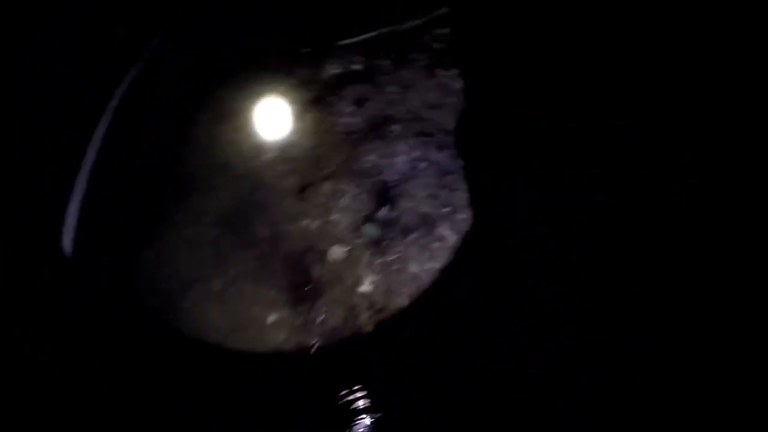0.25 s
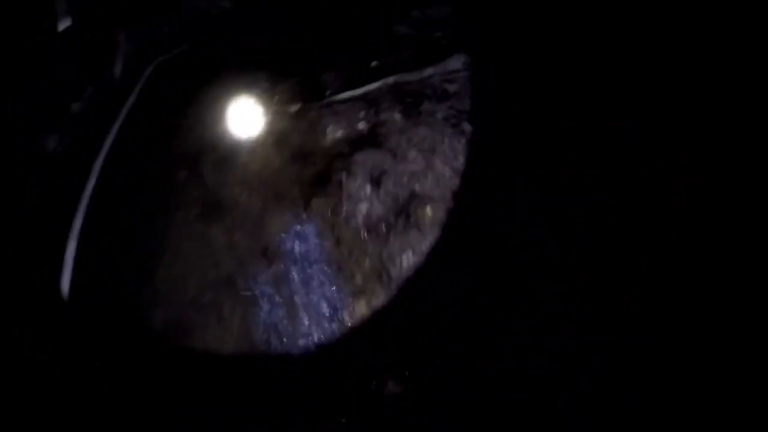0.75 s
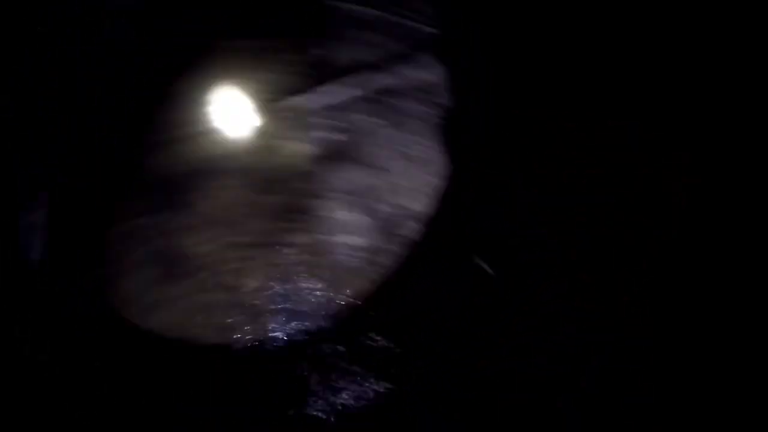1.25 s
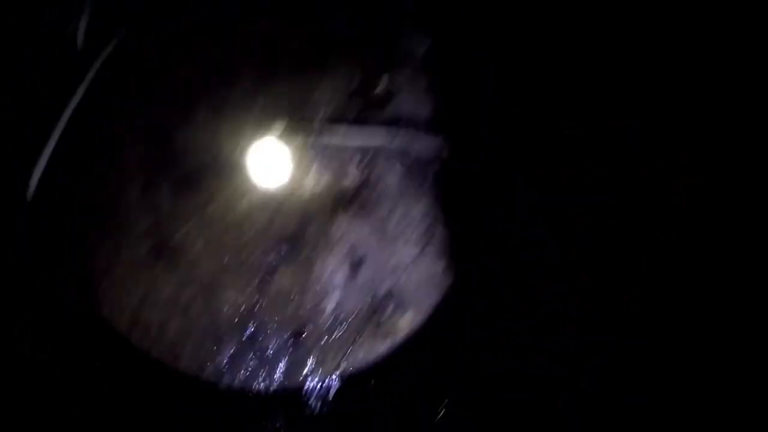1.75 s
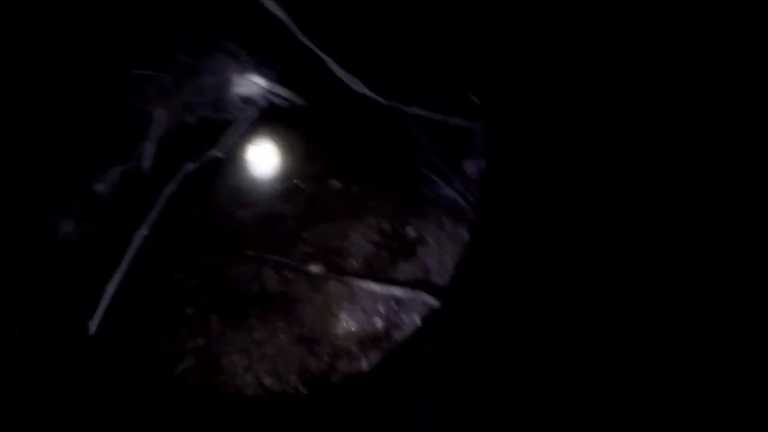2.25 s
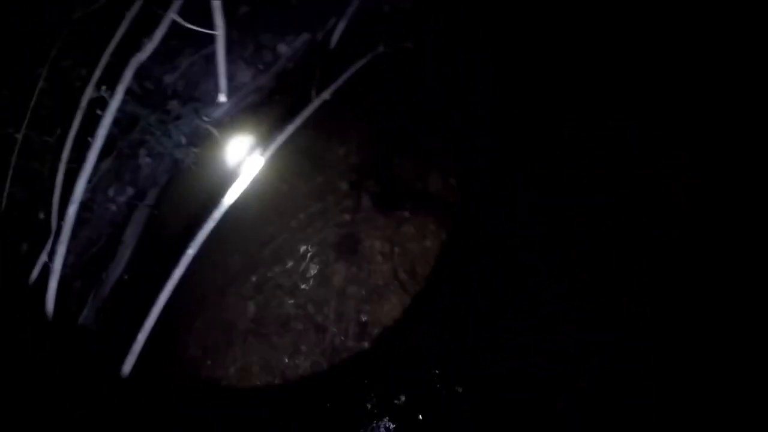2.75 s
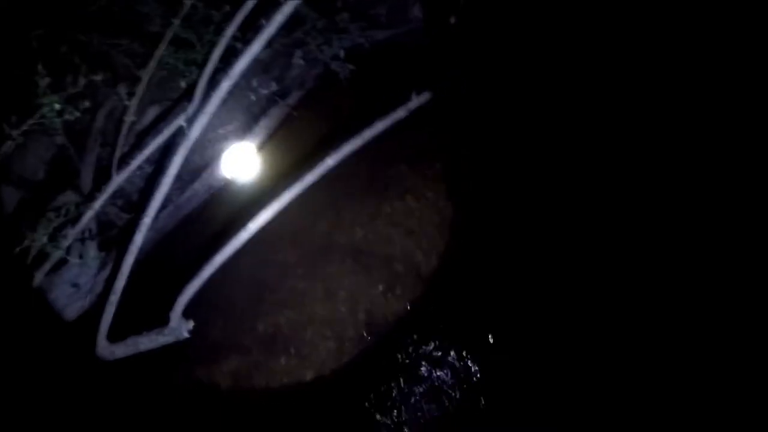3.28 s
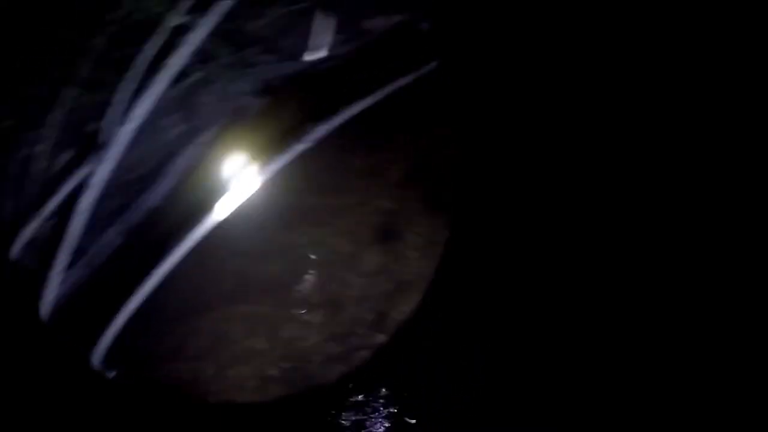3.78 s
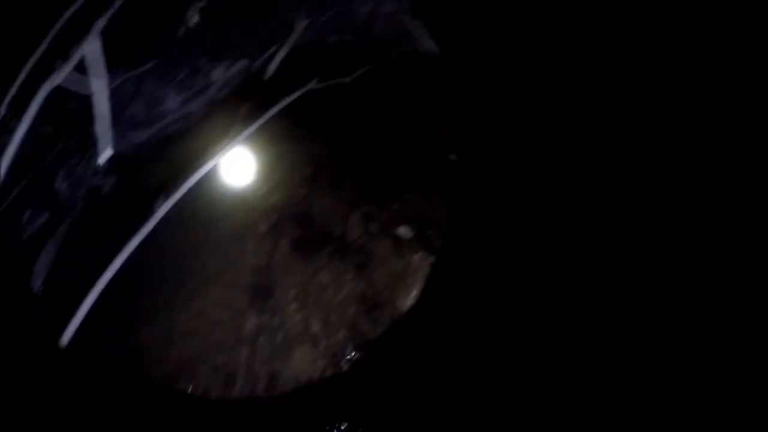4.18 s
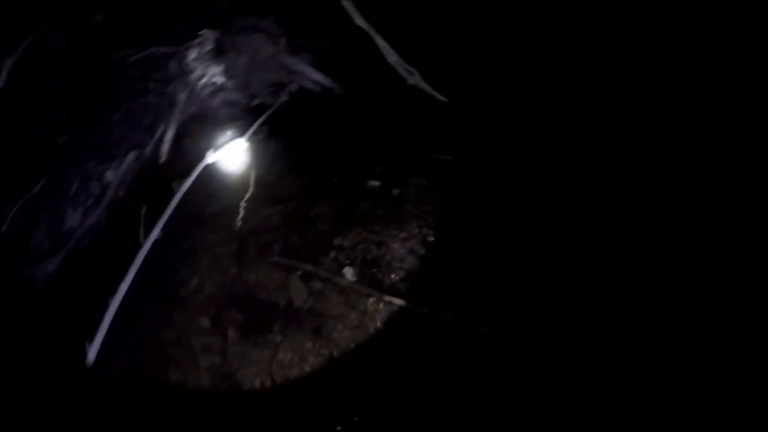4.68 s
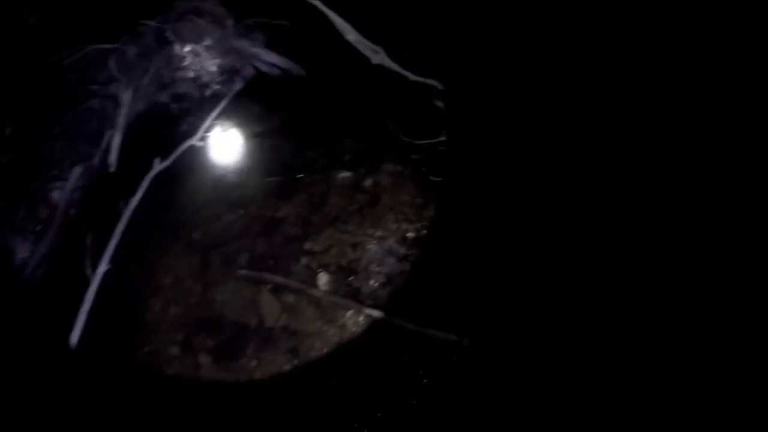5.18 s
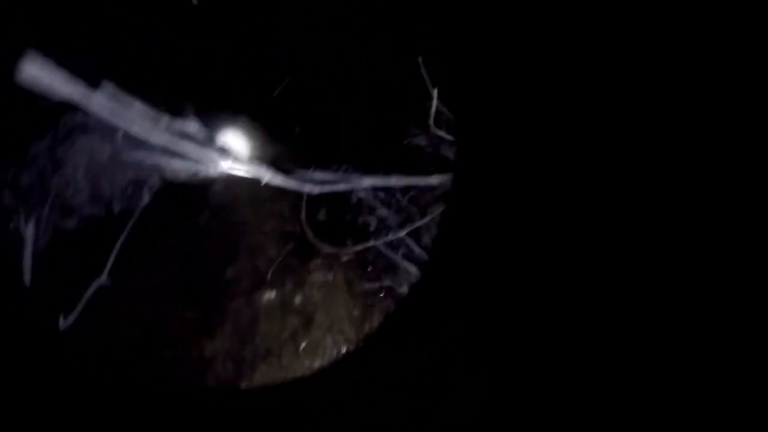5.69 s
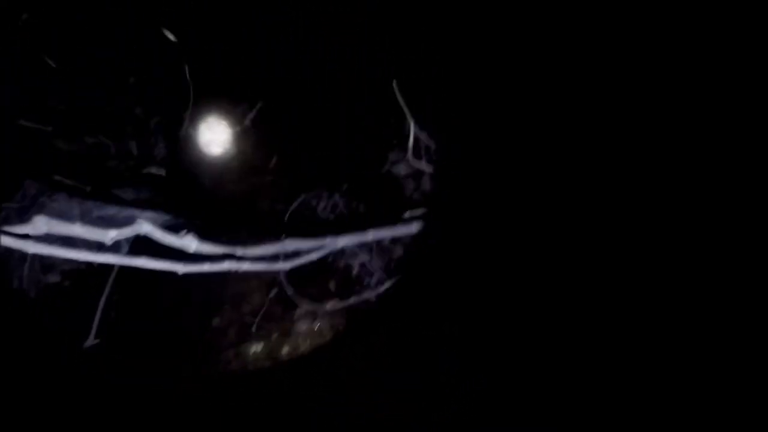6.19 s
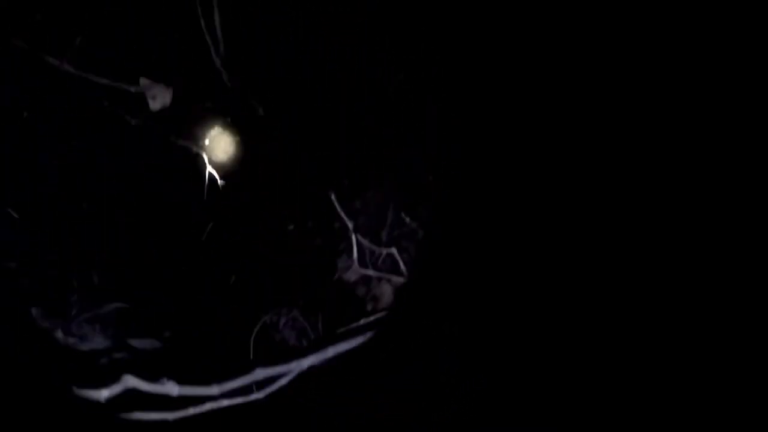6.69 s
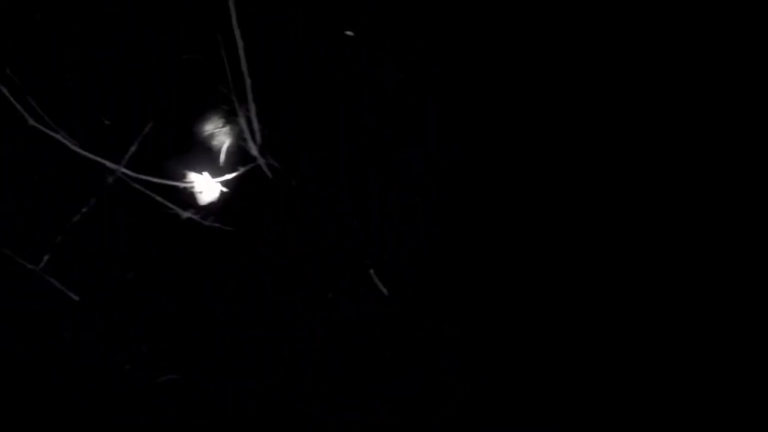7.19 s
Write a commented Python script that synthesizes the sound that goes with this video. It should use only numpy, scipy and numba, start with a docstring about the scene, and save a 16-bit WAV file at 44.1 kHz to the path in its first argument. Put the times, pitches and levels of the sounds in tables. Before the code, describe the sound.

Someone steps through shallow water in the dark, splashing unevenly with dull body bumps, stems crackling past early on, while crickets trill continuously.

```python
"""A shallow creek at night: someone wades slowly, a microphone in a closed housing worn on the body.
Sloshes are bursts of clicks ringing the housing's resonances; bubbles, ticks and knocks are short rings.
Reeds brush past as filtered crackle; sway and thuds of the body are narrow low noise.
Crickets trill in sliding tones, low chirps ring one resonance, katydids and a soft hiss are shaped noise."""
import sys
import numpy as np
from scipy import signal
from scipy.fft import rfft, irfft, next_fast_len
from scipy.io import wavfile
from scipy.ndimage import uniform_filter1d
from numba import njit

SR = 44100
rng = np.random.default_rng(int(sys.argv[2]) if len(sys.argv) > 2 else 0)


def gain_from_decibels(decibels):
    """Convert decibel values to linear amplitude factors."""
    exponent = np.asarray(decibels, float) / 20
    return 10 ** exponent


def master(y):
    """Save y as 16-bit WAV."""
    cut = np.clip(np.atleast_2d(y).T, -1, 1)
    pcm = np.round(cut * 32767)  # scale
    wavfile.write(sys.argv[1], SR, pcm.astype(np.int16))


N = 328211
TIME = np.arange(N) / SR  # s


def level(x, db):
    """Scale to an rms level in dB."""
    return x * gain_from_decibels(db) / np.sqrt(np.mean(x ** 2))


def noise():
    """White noise."""
    return rng.standard_normal(N)


def colour(x, points):
    """Filter by (hz, db) points, straight in log frequency, cut outside them; rms 1."""
    hz, db = np.transpose(points)
    f = np.maximum(np.arange(N // 2 + 1) * SR / N, 1)
    gain_db = np.interp(np.log(f), np.log(hz), db, left=-90, right=-90)
    return level(irfft(rfft(x) * gain_from_decibels(gain_db), N), 0)


def walk(rate_hz):
    """Random levels held 1 / rate_hz and slewed twice; rms 1."""
    k = int(SR / rate_hz)
    steps = np.repeat(rng.standard_normal(N // k + 1), k)
    slewed = uniform_filter1d(uniform_filter1d(steps, k), k)
    return level(slewed[:N], 0)


def grit(rate_hz, spread_db):
    """Random clicks, a few much larger than the rest; rms 1."""
    hit = rng.random(N) < rate_hz / SR
    size = gain_from_decibels(spread_db * rng.exponential(size=N))
    return level(hit * noise() * size, 0)


@njit
def svf(x, hz, width):
    """State-variable band-pass with a moving centre, gain 1 there."""
    y, band, low = np.empty(len(x)), 0., 0.
    for i in range(len(x)):
        g, k = np.tan(np.pi * hz[i] / SR), width / hz[i]
        v = (band + g * (x[i] - low)) / (1 + g * (g + k))
        band, low, y[i] = 2 * v - band, low + 2 * g * v, k * v
    return y


def ring(x, hz, width_hz, drift):
    """Two band-passes in series on one randomly drifting centre; width_hz sets the first; rms 1."""
    centre_hz = hz * (1 + drift * walk(25))
    once = svf(x, centre_hz, 1. * width_hz)
    return level(svf(once, centre_hz, 1.96 * width_hz), 0)


def even(x, samples):
    """Overlap of many small events: partly flattens the short-term power; rms 1."""
    power = uniform_filter1d(x ** 2, samples)
    return level(x / (power + 0.12) ** 0.3, 0)


def steady(x, power):
    """Even out the chance swells of a narrow noise; rms 1."""
    envelope = np.abs(signal.hilbert(x, next_fast_len(N))[:N])
    return level(x / (envelope + 0.75) ** power, 0)


def pings(table, glide):
    """Short rings that swell and die, at their pitch when they peak; positive glide climbs."""
    out = np.zeros(N)
    for start_s, peak_db, pitch_hz, cycles in table:
        first = int(start_s * SR)
        t = TIME[:min(int(4 * cycles / pitch_hz * SR), N - first)]
        age = 2 * t * pitch_hz / cycles  # 1 at the peak
        tone = np.sin(2 * np.pi * pitch_hz * t * (1 + glide * (age - 2)))
        out[first:first + len(t)] += gain_from_decibels(peak_db) * age * np.exp(1 - age) * tone
    return out


def spells(table, rise_db_per_s, fall_db_per_s, rest_db):
    """Gain that rises to each spell, holds and falls again; the loudest spell counts."""
    gain_db = np.full(N, 1. * rest_db)
    for start_s, hold_s, db in table:
        span = slice(max(int((start_s - .5) * SR), 0), int((start_s + hold_s + .5) * SR))
        t = TIME[span]
        before_db = rise_db_per_s * (start_s - t)
        after_db = fall_db_per_s * (t - start_s - hold_s)
        spell_db = db - np.maximum(0, np.maximum(before_db, after_db))
        gain_db[span] = np.maximum(gain_db[span], spell_db)
    return gain_from_decibels(gain_db)


def trill(hz, rate_hz, slide):
    """Each wing stroke is a short tone that slides down."""
    stroke = (np.cumsum(rate_hz * (1 + .06 * walk(6))) / SR + rng.random()) % 1
    pitch_hz = hz * (1 + .012 * walk(30) + slide * (.35 - stroke))
    pulse = np.sin(np.pi * np.clip(stroke / 0.82, 0, 1)) ** 2
    return pulse * np.sin(2 * np.pi * np.cumsum(pitch_hz) / SR)


# sloshes of the legs: (start_s, length_s, drive_db, upper_over_lower_resonances_db, spray_db)
SLOSHES = [(0.143, .011, -62, 24, -22), (.403, .084, -55, 3, -8), (0.496, .016, -54.5, 16, -2),
           (0.629, .022, -52.5, -1, -21), (0.757, .016, -56.5, 11, -11), (.78, .063, -57, 7, 2),
           (0.84, .024, -57, 12, -5), (.877, .0054, -48, 6, 0), (0.894, .054, -50.5, 4, -2.5),
           (0.945, .042, -56.5, 5, -6), (1.04, .029, -46.5, 2.5, -20), (1.198, .077, -56, 2, -12),
           (1.277, .046, -50.5, 5, -7), (1.333, .018, -42, 2, -3), (1.354, .028, -41, 4, -3),
           (1.384, .035, -48, 2, -12), (1.429, .15, -49.5, 0, -5.5), (1.557, .054, -56, -3, -8),
           (1.604, .012, -45, 4, -7), (1.616, .072, -55.5, -1, -9), (1.708, .024, -51.5, 4, -12),
           (1.732, .025, -41.5, 3, -16), (1.797, .05, -53, -5, -13), (1.911, .008, -51, -10, -9),
           (1.99, .038, -50.5, 1, -10), (2.311, .01, -46.5, -4, -15), (2.332, .028, -57.5, -5, -20),
           (2.351, .011, -51, 5, -9), (2.367, .029, -58, -5, -11), (2.596, .021, -55, -2, -9),
           (2.855, .03, -51, -0.5, -16), (3.08, .074, -44.5, 1.5, -11), (3.156, .014, -52, -1, -7),
           (3.322, .011, -49, -7, -19), (3.371, .015, -51.5, 1, -25), (3.418, .0084, -53.5, -2, -18),
           (3.587, .014, -54, -3, -12), (3.606, .04, -45.5, 1.5, -9), (3.652, .081, -54.5, 1, -11),
           (3.748, .031, -51, 0, -7), (3.784, .02, -45.5, 1, -19), (3.803, .024, -57, -1, -11),
           (3.822, .015, -44.5, -4, -25), (3.835, .063, -59, -3, -15), (3.959, .0041, -41, 2, -11),
           (3.979, .017, -45, 6, -15), (3.993, .014, -46, 1, -12), (4.073, .048, -53, 1, -17),
           (4.131, .011, -48.5, -3, -13), (4.93, .045, -53.5, 1, -24), (5.131, .009, -58, -1, -5),
           (6.075, .014, -42, 1, -14), (6.095, .023, -43, 0, -14), (6.183, .018, -55, -1, -13),
           (6.201, .014, -51, -1, -12), (6.214, .04, -45.5, -1.5, -13.5), (6.382, .014, -55.5, 9, -17),
           (6.529, .008, -59, 8, -14), (6.58, .033, -57, -1, -8), (6.613, .023, -48.5, 0, -21),
           (6.678, .02, -56.5, -2, -12), (6.802, .066, -55, -4, -14), (7.052, .097, -58, 3, -10)]
# soft lapping between sloshes: (start_s, hold_s, drive_db)
LAPPING = [(.17, .04, -66), (.27, 0.017, -59.5), (.4, 0.13, -60), (.62, 0.52, -63), (1.2, 0.68, -61.5),
           (1.96, 0.022, -58.5), (2.22, 0.15, -62.5), (2.52, 0.063, -61), (2.68, 0.033, -60.5),
           (2.8, .03, -64), (2.96, 0.33, -63.5), (3.28, .02, -57.5), (3.54, .5, -65), (4.36, 0.011, -66.5),
           (4.72, .01, -69), (4.8, .02, -65), (4.92, .01, -60.5), (5.04, .2, -64.5), (5.32, 0.044, -65.5),
           (5.52, 0.1, -61), (5.72, 0.0076, -58), (5.76, 0.092, -64), (5.92, .01, -61.5),
           (6.0, 0.023, -58.5), (6.28, 0.15, -62), (6.52, 0.17, -62), (6.86, 0.16, -60.5), (7.2, .01, -65),
           (7.34, 0.14, -63.5)]
# housing resonances: (pitch_hz, first_filter_width_hz, weight_db)
HOUSING = [(320, 340, -2), (600, 185, -2), (784, 360, -2), (1100, 420, -4), (1460, 233, -3),
           (1915, 184, -0.5), (2370, 360, -3), (2990, 690, -2), (4200, 1300, -10.5)]
# share of the lowest resonance as the wader turns: (time_s, share_db in a slosh of -46 dB drive)
BODY_SHARE = [(0, -13), (.6, -11), (1.2, -13), (1.9, -7.5), (2.3, -15), (4.0, -17), (6.1, -16),
              (6.6, -11.5), (7.44, -14)]


def sloshes():
    """Bursts of small bubbles and impacts, switched on for each slosh, ring the housing."""
    push = spells(LAPPING, rise_db_per_s=190, fall_db_per_s=210, rest_db=-80) * gain_from_decibels(2.8 * walk(40))
    tilt_db, spray_db, body_db = np.full(N, 0.), np.full(N, -12.), np.full(N, -14.)
    for start_s, length_s, drive_db, slosh_tilt_db, slosh_spray_db in SLOSHES:
        span = slice(int(start_s * SR), int((start_s + length_s) * SR))
        push[span] = gain_from_decibels(drive_db)
        tilt_db[span] = slosh_tilt_db
        spray_db[span] = slosh_spray_db
        # harder sloshes give the lowest resonance a smaller share
        body_db[span] = np.interp(start_s, *np.transpose(BODY_SHARE)) - 0.38 * (drive_db + 46)
    # quick to start, with a short dribble after
    dribble = signal.lfilter([.005], [1, .005 - 1], push)
    push = np.maximum(uniform_filter1d(push, 130), dribble)
    impacts = grit(3000, 0.69)
    rung = np.zeros(N)
    for k, (hz, width_hz, weight_db) in enumerate(HOUSING):
        if hz > 2200:
            share_db = spray_db
        elif hz < 450:
            share_db = body_db
        else:
            share_db = np.clip(1.3 * np.log2(hz / 1000.), -.5, .5) * tilt_db
        # bubbles of one size come and go on their own; impacts strike every resonance at once
        drive = 1.17 * impacts + grit(1500, 0.94)
        gain = gain_from_decibels(weight_db + uniform_filter1d(share_db, 90) + 2.8 * walk(45)) * np.sqrt(width_hz / 1000.)
        rung += (-1) ** k * gain * even(ring(drive, hz, width_hz, 0.022), samples=700)
    return push * rung


# thin high hiss in the hardest splash: (start_s, hold_s, level_db)
SQUIRT = [(1.338, .04, -71)]


def squirt():
    """A brief band of noise around 10 kHz."""
    gain = spells(SQUIRT, rise_db_per_s=1500, fall_db_per_s=1200, rest_db=-110)
    return gain * ring(noise(), 10000, 900, .01)


# the largest bubbles: (start_s, peak_db, pitch_hz)
BUBBLES = [(.763, -46.5, 1460), (.838, -45, 1350), (1.043, -49, 1440), (1.059, -45.5, 740),
           (1.351, -41, 1020), (1.353, -40, 1344), (1.364, -39, 700), (1.37, -40, 1466), (1.402, -46, 1500),
           (1.403, -43, 874), (1.457, -47, 874), (1.6, -51, 1140), (1.736, -50, 1270), (1.744, -38.5, 742),
           (1.749, -48, 1550), (2.312, -48.5, 696), (3.083, -36, 684), (3.102, -37, 807), (3.123, -43, 710),
           (3.13, -37.5, 1490), (3.146, -41, 780), (3.331, -49.5, 820), (3.614, -45, 1270),
           (3.636, -42, 665), (3.783, -50, 960), (3.791, -51, 600), (3.793, -47, 1277), (3.826, -45, 746),
           (3.994, -41, 1490), (3.996, -42, 715), (4.132, -50, 710), (4.136, -43.5, 1037),
           (6.083, -39, 854), (6.085, -39, 1446), (6.215, -41.5, 1240), (6.247, -46, 680),
           (6.52, -54, 1360), (6.625, -44, 837)]


def bubbles():
    """Each plop is a short ring that climbs slightly, as in a bubble near the surface."""
    ring_s = 0.0061  # twice the time to the peak
    return pings([(s, db, hz, hz * ring_s) for s, db, hz in BUBBLES], glide=0.0036)


# reeds dragged past, stroke by stroke: (start_s, hold_s, treble_level_db)
REED_STROKES = [(.41, .06, -72), (.5, 0.0044, -54), (.642, 0.012, -62), (.72, 0.077, -63), (.82, .02, -57),
                (.884, 0.0071, -57), (.946, .01, -66), (1.36, 0.013, -68), (1.45, 0.11, -64),
                (1.59, .14, -74)]
# tone of the scrape: (pitch_hz, density_db_per_hz)
REED_COLOUR = [(1180, -3.5), (2000, -7), (2180, -7), (2410, -7.5), (3060, -11.5), (4290, -1), (5440, -14.5),
               (6550, -13), (8810, -16), (10000, -23), (15200, -25.5)]


def reeds():
    """Blades scrape in crackly strokes, each size of blade on its own."""
    stroke = spells(REED_STROKES, rise_db_per_s=350, fall_db_per_s=310, rest_db=-96)
    blades = np.zeros(N)
    for hz in 1800 * 2 ** np.arange(0, 3.2, .5):
        crackle = grit(900, 1.9) + 0.78 * noise()
        blades += svf(crackle, np.full(N, hz), hz / 3)
    scrape = colour(blades, REED_COLOUR)
    treble = signal.sosfilt(signal.butter(4, 5800, "high", fs=SR, output="sos"), scrape)
    return stroke * scrape / np.std(treble)


# single ticks: (start_s, peak_db, pitch_hz, cycles to twice the peak time)
TICKS = [(0.501, -35, 4160, 9.5), (0.501, -37.5, 6570, 8.7), (0.501, -42, 8000, 7.2),
         (0.533, -42, 3930, 14), (.5847, -57, 6400, 9.4), (.66, -42, 3720, 8), (.7139, -50, 6500, 14),
         (0.7493, -40, 2380, 11), (.7563, -46, 4200, 6.7), (0.785, -45, 2500, 14), (.802, -44, 2500, 12),
         (.812, -40, 4050, 7.4), (0.8208, -29.5, 3920, 5.2), (.8201, -44, 6160, 10), (.855, -55, 13000, 6),
         (0.878, -46, 2330, 9.1), (.884, -47, 8700, 8), (.890, -43, 8300, 7), (.889, -38.5, 3620, 14),
         (.906, -53, 8200, 8), (1.342, -32, 1990, 17), (1.345, -34.5, 2800, 10), (1.446, -42, 6600, 3),
         (1.5964, -51, 6600, 4), (1.342, -47, 4600, 12), (1.352, -44, 4300, 10), (1.366, -48, 4700, 10),
         (1.472, -44, 2820, 10), (1.519, -51, 6500, 8.7), (1.806, -49, 2300, 7.4), (2.0, -46, 1800, 1.5),
         (2.575, -51, 900, 1.5), (2.599, -40, 1240, 1.6), (2.614, -44, 1900, 1.4), (5.137, -48, 1700, 1.3),
         (5.51, -52, 1300, 1.4), (5.81, -54, 900, 1.5), (5.86, -54, 900, 1.5), (6.69, -47, 1510, 1.7),
         (6.775, -50, 1100, 1.1), (6.99, -47, 1300, 1.4), (7.045, -49, 2300, 2.5), (7.36, -62, 1400, 1.6)]


def ticks():
    """Single stems snap back or drops tick, each with a short ring."""
    return pings(TICKS, glide=0.0029)


# swings of the body: (start_s, hold_s, gain_db)
SWINGS = [(0, 0.027, -29.5), (.21, 0.0075, -32.5), (.39, 0.02, -29), (.48, 0.0031, -27.5),
          (.68, 0.048, -27.5), (.78, 0.11, -31), (.99, 0.17, -34.5), (1.28, .13, -29), (1.44, 0.096, -26.5),
          (1.68, 0.0045, -26), (1.8, 0.062, -26.5), (1.9, 0.19, -32), (2.22, .01, -33.5),
          (2.32, 0.038, -27.5), (2.53, 0.0038, -29.5), (2.65, 0.004, -28), (2.78, 0.052, -28.5),
          (3.0, 0.04, -27), (3.11, 0.12, -30.5), (3.25, 0.037, -27.5), (3.36, 0.35, -32.5),
          (3.77, 0.034, -26), (3.92, 0.14, -31), (4.23, 0.054, -33.5), (4.37, .005, -30.5),
          (4.5, 0.065, -33.5), (4.7, 0.11, -31.5), (4.98, .24, -34.5), (5.34, .3, -35.5),
          (5.76, 0.18, -35.5), (6.03, 0.089, -32.5), (6.25, 0.16, -30), (6.59, 0.019, -23.5),
          (6.71, 0.097, -27.5), (6.92, 0.013, -26.5), (7.1, .15, -33), (7.33, 0.24, -31)]
# sway before it is evened and smoothed: (pitch_hz, density_db_per_hz)
SWAY_COLOUR = [(10, -10.5), (16, 1.5), (27, 0), (44, 1.5), (60, -7), (90, -51)]


def sway():
    """The housing sways with the body in slow, rounded swings: evened noise below 75 Hz."""
    swing = steady(colour(noise(), SWAY_COLOUR), 0.64)
    swing = signal.sosfiltfilt(signal.butter(4, 75, fs=SR, output="sos"), swing)
    return spells(SWINGS, rise_db_per_s=158, fall_db_per_s=197, rest_db=-38.5) * swing


# thuds that reach the housing through the body: (start_s, dull_gain_db, firm_over_dull_db)
THUDS = [(0, -47, -11), (.14, -40, -9), (.39, -44.5, -10), (.46, -37, -24), (.72, -42.5, -13),
         (.81, -53, -18), (.99, -45.5, -5.5), (1.3, -43.5, -13), (1.37, -40, -3), (1.47, -39, -5),
         (1.76, -37.5, -9.5), (1.84, -36.5, -13), (2.09, -44, -20), (2.34, -42, -14), (2.57, -42.5, -20),
         (2.82, -44, -9), (3.02, -43, -25), (3.27, -44.5, -13), (3.4, -45.5, -6.5), (3.69, -44, -11),
         (3.81, -38, -19), (4.02, -45.5, -16), (4.7, -42.5, -17), (4.85, -46, -8), (4.95, -49, -12),
         (5.12, -45.5, -9), (5.53, -43.5, -9), (5.8, -47, -13), (6.05, -46, -12), (6.34, -39.5, -9),
         (6.57, -43, -20), (6.65, -42, -11), (7.09, -41.5, -20), (7.21, -49, -15), (7.38, -41.5, -11)]
# dull and firm part of a footfall: (pitch_hz, first_filter_width_hz)
THUD_BANDS = [(78, 27.9), (132, 38)]


def thuds():
    """Footfalls come in quick uneven jolts of two low noise bands."""
    dull, firm = (steady(ring(noise(), hz, width_hz, 0.019), 0.19) for hz, width_hz in THUD_BANDS)
    firm = signal.sosfilt(signal.butter(3, 190, fs=SR, output="sos"), firm)
    dull_hits = [(s, 0, db) for s, db, _ in THUDS]
    firm_hits = [(s, 0, db + more_db) for s, db, more_db in THUDS]
    dull = dull * spells(dull_hits, rise_db_per_s=123, fall_db_per_s=118, rest_db=-48.5)
    firm = firm * spells(firm_hits, rise_db_per_s=116, fall_db_per_s=100, rest_db=-59)
    return gain_from_decibels(1.9 * walk(28)) * (dull + firm)


# knocks on the housing: (start_s, peak_db, pitch_hz)
KNOCKS = [(.137, -46, 157), (.39, -45, 156), (0.461, -37, 90), (.538, -41, 130), (.695, -30.5, 79),
          (.801, -35.5, 89.5), (.973, -40, 109), (1.345, -43.5, 219), (1.356, -32, 130), (1.464, -40, 102),
          (1.771, -44.5, 130), (1.825, -40, 102), (1.914, -36.5, 130), (1.974, -47, 144),
          (2.074, -38.5, 107), (2.557, -38.5, 101), (3.003, -34, 87), (3.236, -34.5, 96), (3.794, -32, 115),
          (4.082, -43, 124), (5.502, -40.5, 131), (6.093, -37, 138), (6.195, -39.5, 124),
          (6.299, -35.5, 101), (6.566, -44, 91), (7.205, -44, 99), (7.37, -43.5, 129)]


def knocks():
    """Each knock is a brief low ring that falls in pitch."""
    ring_s = 0.026  # twice the time to the peak
    return pings([(s, db, hz, hz * ring_s) for s, db, hz in KNOCKS], glide=-0.035)


# chorus level, joined by straight lines: (time_s, level_db)
CHORUS = [(0, -56.5), (1.08, -59), (1.43, -57.5), (4.14, -59), (4.54, -55.5), (4.7, -59), (5.08, -56.5),
          (7.19, -58), (7.44, -54.5)]
# trilling crickets: (pitch_hz, pulse_rate_hz, relative_db)
SINGERS = [(3396, 39.5, -6.5), (3424, 41.5, -6), (3520, 30, -2.5), (3560, 43.0, -3.5), (3656, 40.5, -1.5),
           (3705, 42.0, -5), (3820, 36.0, -9.5)]


def cricket_chorus():
    """Singers swell and fade; the banks smear them; the farthest blur into a band."""
    singers = sum(gain_from_decibels(db + 3.8 * walk(4.0)) * trill(hz, rate_hz, .09) for hz, rate_hz, db in SINGERS)
    tail = rng.standard_normal(6000) * np.exp(-TIME[:6000] / 0.068)
    echo = signal.fftconvolve(singers, tail)[:N]
    far = ring(noise(), 3565, 330, 0.014)
    chorus = level(level(singers, 0) + level(echo, -2.5) + level(far, 0.21), 0)
    return gain_from_decibels(np.interp(TIME, *np.transpose(CHORUS))) * chorus


# one lower cricket close by: (start_s, hold_s, level_db)
NEAR_CRICKET = [(.21, 1, -68), (2.62, 0.065, -61), (2.96, 0.024, -61), (3.27, 0.12, -57.5),
                (3.69, .01, -56), (4.06, .01, -54), (4.35, 0.12, -64), (5.1, .07, -62), (5.49, .04, -60),
                (6.05, .05, -70), (6.4, 0.066, -59.5), (6.92, .01, -54), (7.35, .09, -68)]


def near_cricket():
    """One trill in spells, its level flickering."""
    gain = spells(NEAR_CRICKET, rise_db_per_s=140, fall_db_per_s=160, rest_db=-77)
    return gain * level(trill(3390, 40.5, .105) * gain_from_decibels(3.5 * walk(40)), 0)


# low chirps from the bank: (start_s, hold_s, level_db)
CHIRPS = [(.38, 0.032, -58.5), (.5, .01, -67), (.82, .01, -68), (.94, 0.051, -56.5), (1.16, 0.067, -62),
          (1.3, .04, -56), (1.46, .005, -50), (1.5, 0.036, -54), (1.66, .01, -58), (2.37, .01, -61),
          (2.69, .01, -61), (2.8, .01, -58.5), (3.01, .01, -57), (4.41, .01, -67), (4.7, .03, -67),
          (4.84, .01, -59), (5.05, 0.0074, -60), (5.13, 0.071, -61.5), (5.29, .08, -68), (5.49, .01, -62.5),
          (5.57, .01, -61), (6.37, .01, -63), (6.8, 0.13, -63), (7.08, 0.011, -56), (7.14, 0.089, -67),
          (7.4, .04, -61.5)]


def chirps():
    """Quick tooth-strike clicks and some noise ring one low resonance."""
    strikes = grit(400, 1.4) + 0.47 * noise()
    gain = spells(CHIRPS, rise_db_per_s=450, fall_db_per_s=520, rest_db=-75)
    return gain * even(ring(strikes, 1977, 140, 0.011), samples=700)


# distant crowd: (pitch_hz, first_filter_width_hz, level_db)
KATYDIDS = [(4300, 70, -72.5), (4600, 330, -68.5), (4960, 330, -64.5), (5290, 750, -69.5), (6500, 450, -82)]


def katydids():
    """A distant rasping crowd, blurred to bands of hiss that flicker a little."""
    return sum(gain_from_decibels(db + .8 * walk(12)) * ring(noise(), hz, width_hz, 0.0059) for hz, width_hz, db in KATYDIDS)


# tone of the hiss: (pitch_hz, density_db_per_hz)
HISS = [(150, -22), (364, -15.5), (883, -15), (1960, -18), (2620, -20.5), (4000, -15), (5900, -27),
        (8000, -28), (13600, -31.5), (15300, -34.5)]


def night_hiss():
    """Steady coloured noise."""
    return gain_from_decibels(-63.5) * colour(noise(), HISS)


def scene():
    """All sources at one microphone, over the night hiss."""
    water = sloshes() + squirt() + bubbles()
    brush = reeds() + ticks()
    motion = sway() + thuds() + knocks()
    insects = cricket_chorus() + near_cricket() + chirps() + katydids()
    return (water + brush + motion + insects + night_hiss())[None]


def top_cut(x):
    """Nothing passes above the cut-off."""
    return signal.sosfilt(signal.butter(12, 15310, fs=SR, output="sos"), x)


def record(dry):
    """The microphone's mix is the finished mix."""
    return top_cut(dry)


dry = scene()
out = record(dry)
master(out)
```